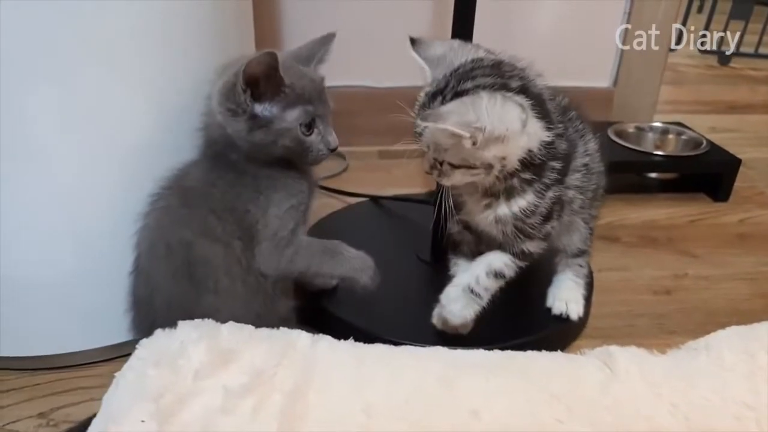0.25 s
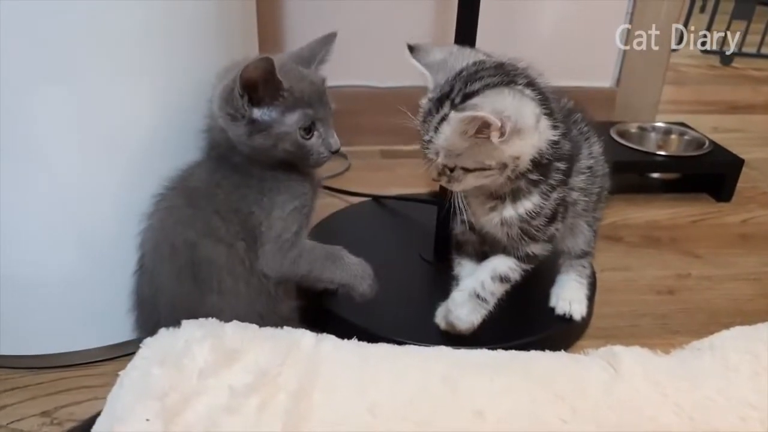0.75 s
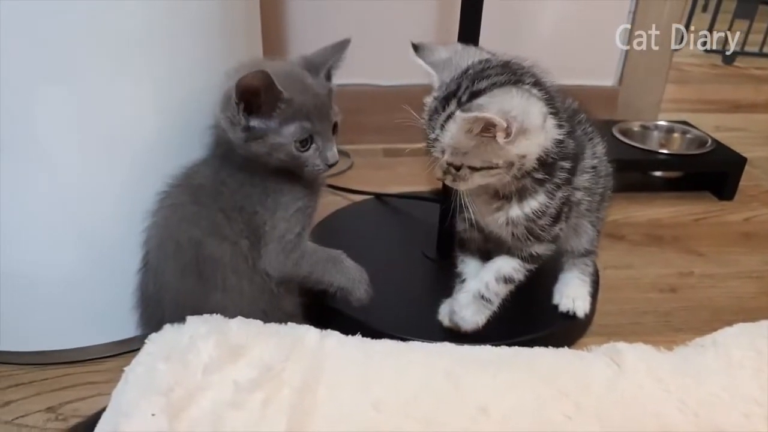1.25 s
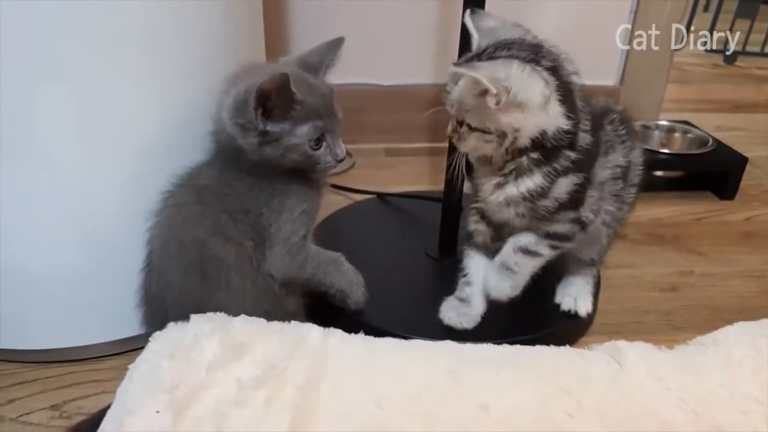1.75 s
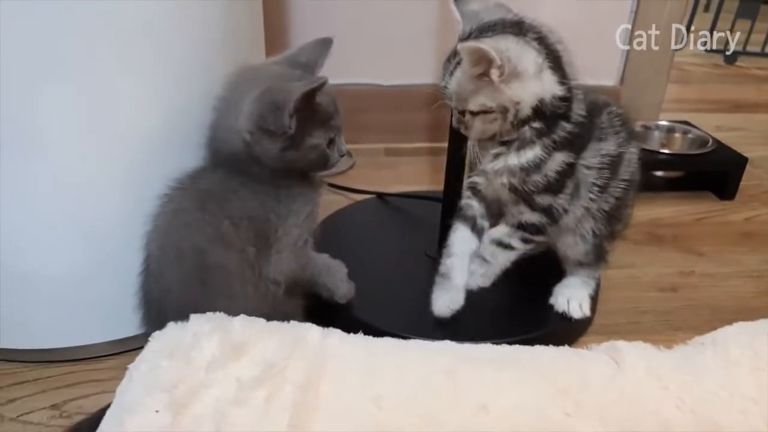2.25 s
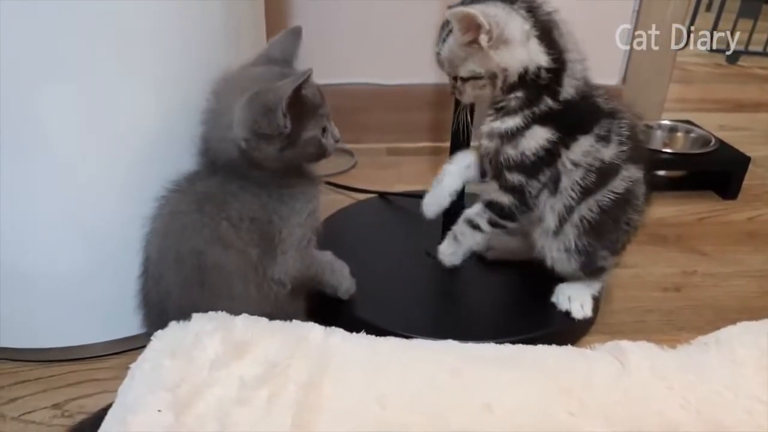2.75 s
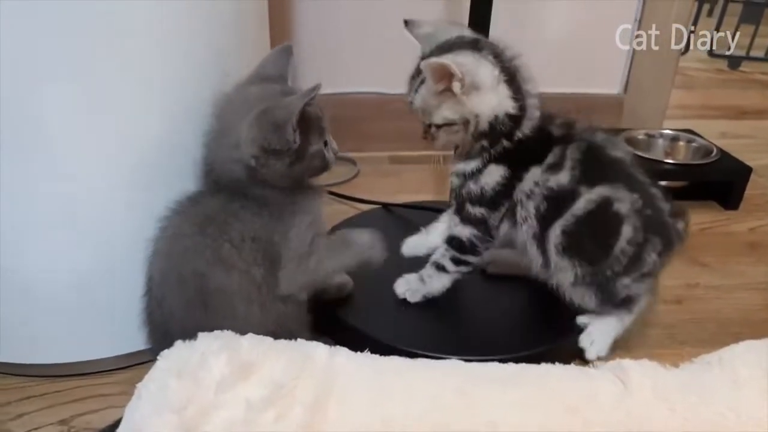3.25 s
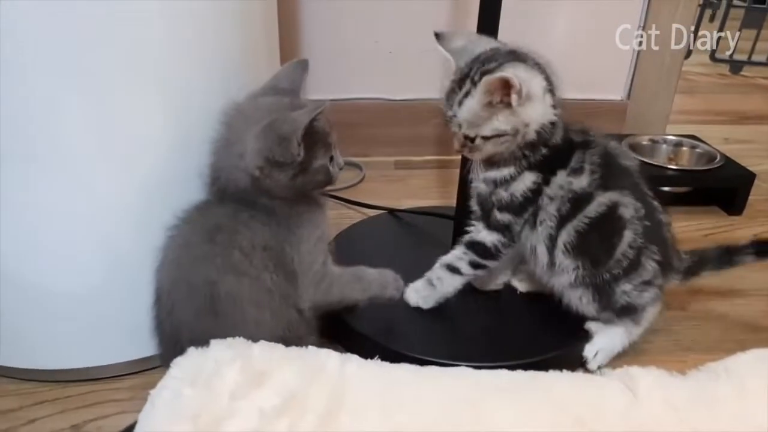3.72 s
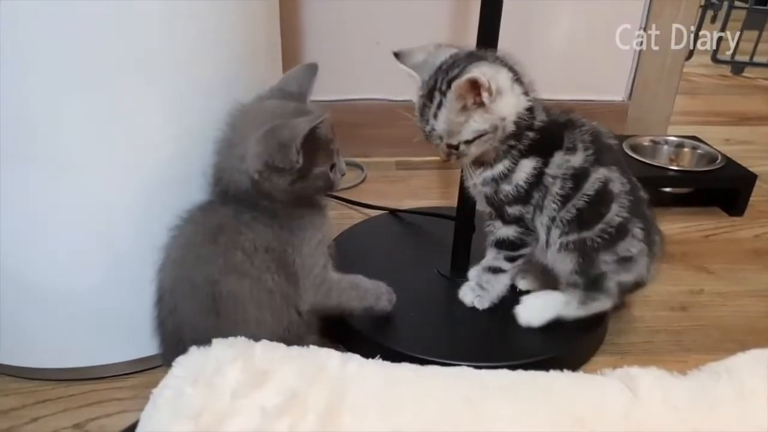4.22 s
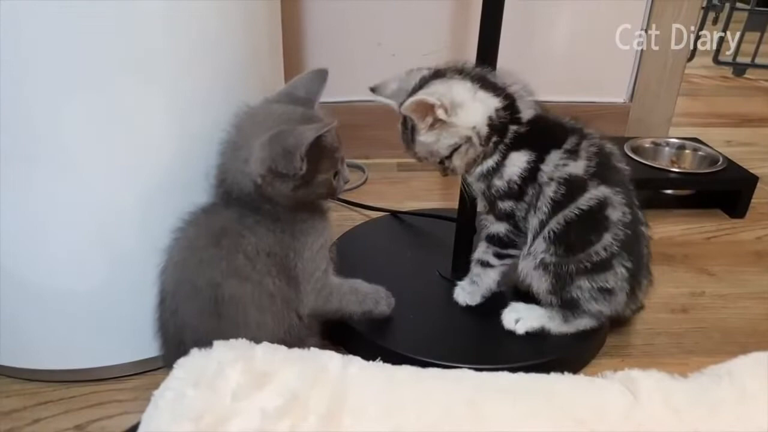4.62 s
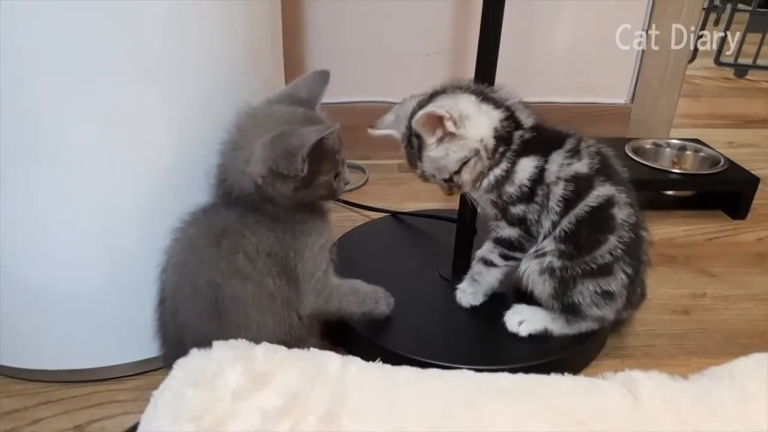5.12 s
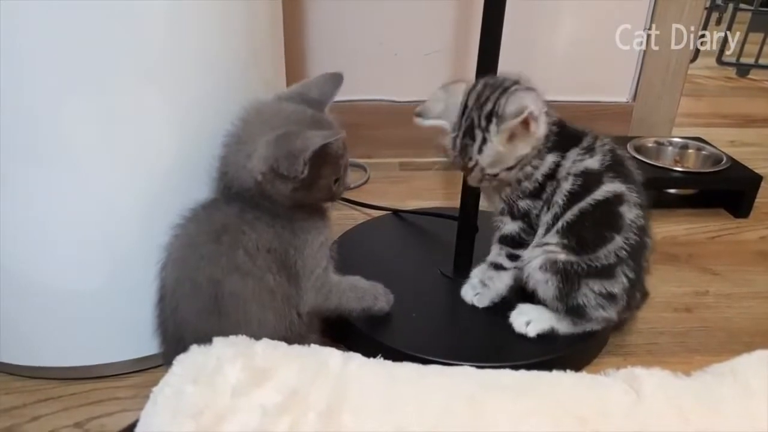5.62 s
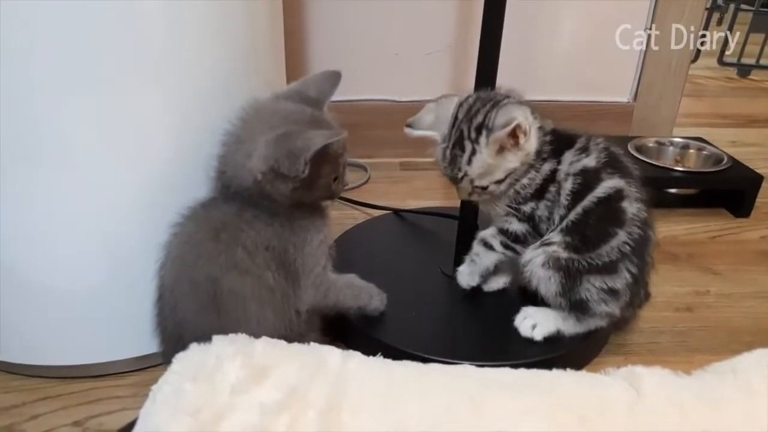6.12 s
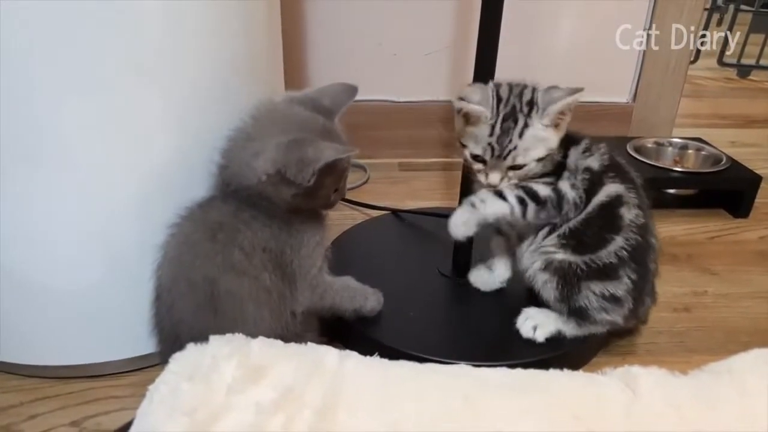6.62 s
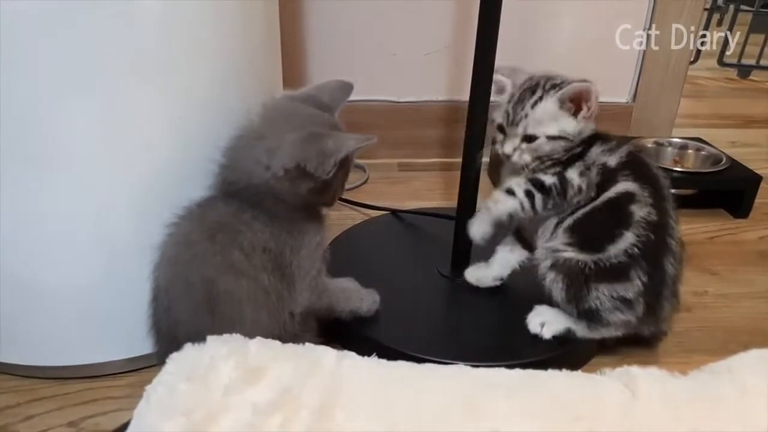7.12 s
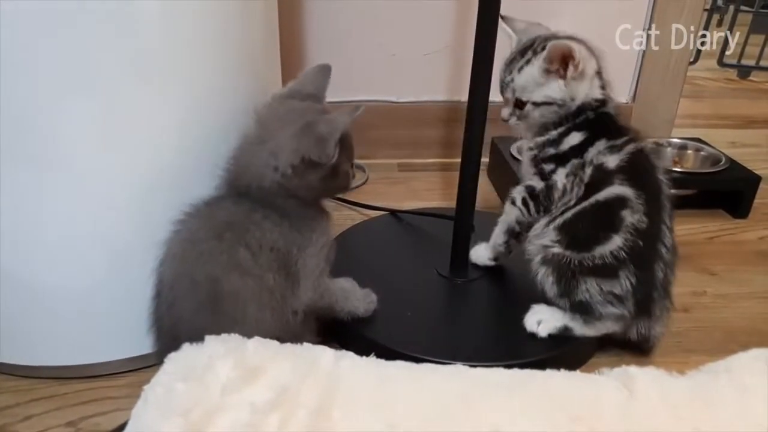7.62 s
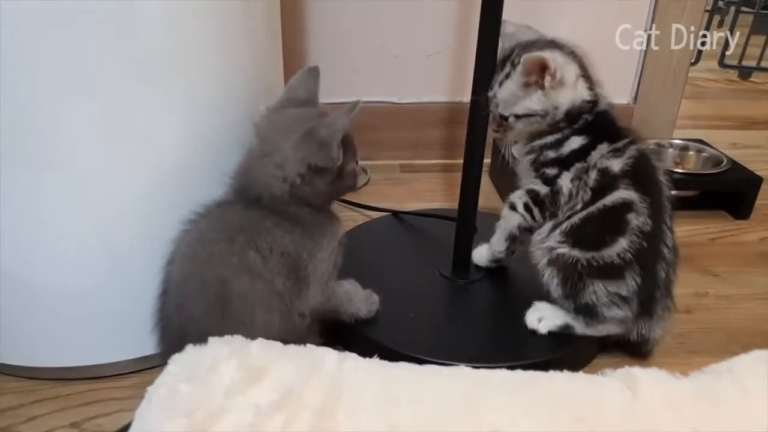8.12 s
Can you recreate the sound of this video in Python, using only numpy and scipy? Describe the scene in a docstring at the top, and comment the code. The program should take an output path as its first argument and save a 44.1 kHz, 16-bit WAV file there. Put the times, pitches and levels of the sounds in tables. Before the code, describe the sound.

A quiet room with a deep, distant engine drone that swells and fades in uneven pulses, rising slightly in pitch over the first 2.5 seconds and slowly sinking after 4. Muffled traffic roar, faint hiss and a soft murmur on the right lie beneath. Almost nothing happens nearby until a faint brush at 1.9 and a tiny high squeak at 2.3, about a tenth of a second long, dipping then rising. From 3.0 to 3.75 paws rub the plastic base in light, fuzzy scuffs. Faint touches and a soft landing follow from 4.1 to 5.0. At 5.5 scraping starts, peaking at 5.65-5.75 with a hard, bright rattle of claw clicks; another scratch comes at 6.1. A soft thump falls at 6.6, gentle scuffs around 7.0-7.2, a deeper dull thump at 7.6, and a last faint tick and brush at 8.1.

```python
"""Kittens scuffling on a plastic base

Paws of two kittens drag and claws click close by: noise and impulses excite the modes of the hard base,
with fur fizz, damped-sine landings, a short room tail and one squeak of gliding sines with subharmonics.
Behind them a distant engine drones as wavering multiples of its firing pattern, with hum and rumble,
under traffic roar and microphone hiss of filtered noise; the right microphone adds a resonant murmur."""
import sys
import numpy as np
from scipy import signal
from scipy.fft import rfft, irfft, next_fast_len
from scipy.io import wavfile
from scipy.ndimage import map_coordinates

SR = 44100
rng = np.random.default_rng(int(sys.argv[2]) if len(sys.argv) > 2 else 0)


def output_pcm(signal):
    """Save a mono or channel-first signal as 16-bit PCM at the path in sys.argv[1].

    Samples are clipped to [-1, 1] before scaling.
    """
    pcm = np.clip(np.atleast_2d(signal).T, -1, 1) * 32767
    wavfile.write(sys.argv[1], SR, np.round(pcm).astype(np.int16))


N = 369205  # length in samples


def amp(db):
    """Level law: decibels to amplitude gain."""
    return 10 ** (np.asarray(db) / 20)


def unit(x):
    """Normalisation: each channel is brought to rms 1."""
    return x / np.sqrt(np.mean(x ** 2, axis=-1, keepdims=True) + 1e-20)


def along(points, hz):
    """Interpolation on a logarithmic frequency axis through (f, value) points."""
    f, v = np.transpose(points)
    return np.interp(np.log(hz + 1), np.log(f + 1), v)


def curves(rows):
    """Linear interpolation in time: one value per sample for each column after the time."""
    s, *columns = np.transpose(rows)
    t = np.arange(N) / SR
    return np.array([np.interp(t, s, column) for column in columns])


def wobble(rate):
    """Slow random modulation: a smooth curve through random knots, rate of them a second."""
    knots = rng.standard_normal(int(N * rate / SR) + 4)
    return map_coordinates(knots, [np.arange(N) * rate / SR])


def filtered(x, response):
    """Linear filtering: the spectrum of x times a complex response of frequency."""
    m = next_fast_len(N + SR // 2)
    hz = np.fft.rfftfreq(m, 1 / SR)
    return irfft(rfft(x, m) * response(hz), m)[..., :N]


def coloured(spectrum, channels):
    """Spectral shaping of white noise: uncorrelated channels of rms 1 with one spectrum."""
    white = rng.standard_normal((channels, N))
    return unit(filtered(white, lambda hz: amp(along(spectrum, hz))))


def modes(table):
    """Modal superposition: causal resonances of alternating sign, unit mean power in the last column."""
    def response(f):
        total = 0
        for k, (centre, width, *db) in enumerate(table):
            resonance = 1j * f * width / (centre * centre - f * f + 1j * f * width)
            total = total + (-1) ** k * amp(db)[:, None] * resonance
        return total / np.sqrt(np.mean(np.abs(total[-1]) ** 2))
    return response


def room_tone():
    """Stationary and swelling noise: far traffic, microphone hiss, and resonant murmur at the right."""
    # relative noise density of the traffic: f/Hz, level/dB
    traffic_spectrum = [(150, -30), (220, 4), (400, -7.5), (520, -7.5), (700, -11.5), (850, -12.5),
                        (1200, -20), (2500, -50.5)]
    # strength of the traffic roar, before gusts: t/s, level/dB
    roar_level = [(0, -67), (.3, -75), (1.49, -69), (1.89, -76), (2.3, -62.5), (4.05, -62), (4.31, -58.5),
                  (5.5, -63), (5.8, -60), (6.36, -62), (7.81, -61), (8, -67), (8.37, -63.5)]
    # relative noise density of the hiss: f/Hz, level/dB
    hiss_spectrum = [(300, -29), (700, -2), (1500, -3.5), (3000, -5), (7500, -15.5), (12000, -13),
                     (16000, -14.5)]
    # resonances at the right microphone: f/Hz, width/Hz, relative level/dB
    murmur_humps = [(280.8, 56, 3), (321.3, 14, 1), (430, 174, -15.5), (590, 180, -20.5), (824, 36, -19.5),
                    (1608, 170, -27), (2330, 89, -29.5), (2894, 250, -25), (3150, 88, -18),
                    (3335, 270, -21), (3687, 90, -21.5), (4290, 200, -35.5), (11900, 740, -42)]
    # strength of the high humps of the murmur: t/s, level/dB
    high_murmur_level = [(0, -63.5), (1.2, -65.5), (2.2, -60.5), (2.9, -61.5), (4, -62.5), (6.5, -62),
                         (8.37, -64.5)]

    left, right, both = coloured(traffic_spectrum, channels=3)
    gusts_db = 1.5 * wobble(4)
    roar = amp(curves(roar_level)[0] + gusts_db) * (np.array([left, right]) + 0.68 * both)
    tone = roar + amp(-69) * coloured(hiss_spectrum, channels=2)

    def humps(f):
        power = sum(amp(2 * db) / (1 + (2 * (f - hz) / width) ** 4) for hz, width, db in murmur_humps)
        return np.sqrt(power)

    def murmur(band):
        wandering = rng.standard_normal(N) * amp(1.6 * wobble(8))
        return unit(filtered(wandering, lambda f: humps(f) * band(f)))

    # low and high humps waver apart
    tone[1] += amp(-50.5) * murmur(lambda f: f < 2000)
    tone[1] += amp(curves(high_murmur_level)[0]) * murmur(lambda f: f >= 2000)
    return tone


def engine():
    """Harmonic series of a periodic source: multiples of the firing pattern, with mains hum and rumble."""
    # far engine, rate of the firing pattern: t/s, f/Hz
    firing_rate = [(0, 24.3), (.7, 24.65), (1.3, 25.9), (2, 26.4), (2.7, 26.5), (3.4, 26.5), (4.1, 25.8),
                   (5, 24.7), (6, 24.05), (6.6, 23), (7, 22.2), (7.6, 21.3), (8.37, 20.6)]
    # swelling and fading of multiple 4: t/s, rms level/dB
    fourth_level = [(0, -36), (.27, -48), (.66, -39), (1.06, -58), (1.2, -36), (1.46, -34.5), (1.8, -50.5),
                    (1.99, -41), (2.26, -40), (2.52, -45.5), (2.66, -30), (2.8, -52), (3.06, -30),
                    (3.19, -48), (3.32, -36), (3.46, -49), (3.6, -39), (3.72, -37), (3.9, -43.5),
                    (4.04, -27), (4.15, -44), (4.3, -30), (4.58, -42.5), (4.78, -33), (5.05, -25.5),
                    (5.17, -43.5), (5.31, -35), (5.45, -43.5), (5.58, -34), (5.71, -48.5), (5.98, -38),
                    (6.11, -43), (6.4, -34), (6.64, -42.5), (6.86, -35), (7.04, -47), (7.17, -37),
                    (7.31, -52), (8.1, -50), (8.37, -47.5)]
    # swelling and fading of multiple 6: t/s, rms level/dB
    sixth_level = [(0, -53.5), (.66, -47), (.93, -56), (1.2, -47.5), (1.59, -47), (1.73, -57), (2.26, -40),
                   (2.39, -44.5), (2.52, -38), (2.66, -46), (2.79, -38), (3.06, -49.5), (3.19, -56),
                   (3.33, -41), (3.46, -55), (3.59, -41.5), (3.95, -43.5), (4.1, -35.5), (4.25, -49),
                   (4.38, -40.5), (4.85, -51.5), (5.05, -43), (5.31, -46), (5.55, -71), (5.85, -41),
                   (5.98, -59), (6.24, -41.5), (6.4, -59), (8.37, -73)]
    # weak multiples, before walls and drift: multiple, rms level/dB
    weak_orders = [(2, -50.5), (3, -49.5), (3.5, -49), (5, -45), (7, -53.5), (8, -59)]
    # transmission through the walls: f/Hz, gain/dB
    walls = [(42, -6), (50, -2), (64, -4), (74, 2.5), (90, -13.5), (105, 3.5), (120, 0), (132, -17),
             (160, 6), (180, -10), (215, -36)]
    # hum of an appliance: f/Hz, rms level/dB
    mains = (59.6, -55.5)
    # relative noise density of the rumble: f/Hz, level/dB
    rumble_spectrum = [(20, -31.5), (40, -8.5), (50, -7.5), (80, -5), (110, 0), (165, -8), (200, -20.5),
                       (300, -24.5), (500, -41.5), (900, -49.5), (2000, -88.5)]
    drift_db = 3.5  # slow wavering of the weak multiples

    speed = curves(firing_rate)[0]
    turns = np.cumsum(speed) / SR
    levels = [(4, curves(fourth_level)[0]), (6, curves(sixth_level)[0])]
    for order, db in weak_orders:
        levels.append((order, db + along(walls, order * speed) + drift_db * wobble(4)))
    lines = np.zeros(N)
    for order, db in levels:
        phase = 2 * np.pi * (order * turns + rng.random()) + 0.49 * wobble(6)
        lines += np.sqrt(2) * amp(db) * np.sin(phase)

    hum_hz, hum_db = mains
    hum = np.sqrt(2) * amp(hum_db) * np.sin(2 * np.pi * hum_hz * np.arange(N) / SR)
    shared, apart = coloured(rumble_spectrum, channels=2)
    centre = (lines + hum + amp(-42.5) * shared) * amp([[-.25], [.25]])
    return centre + amp(-53) * apart * [[1], [-1]]  # a little rumble in antiphase


def thuds():
    """Damped oscillation: a soft paw landing is a low sine with a quick onset and exponential decay."""
    # soft landings: t/s, level/dB of the decay at its start, f/Hz
    landings = [(4.08, -37, 150), (6.575, -32, 190), (7.638, -24, 72)]
    out, t = np.zeros(N + SR), np.arange(SR // 5) / SR
    for s, db, hz in landings:
        decay = amp(db - 60 * t / 0.1)  # 60 dB in 0.1 s
        onset = 1 - np.exp(-t / 0.0019)
        out[round(s * SR):][:len(t)] += decay * onset * np.sin(2 * np.pi * hz * t)
    return out[:N]


def squeak():
    """Stick-slip friction: a gliding tone and octave, with subharmonics from alternate weak pulses."""
    # glide of the squeak: t/s, f/Hz, level/dB of the fundamental before roughness and balance
    glide = [(2.283, 1120, -75), (2.288, 1080, -53), (2.298, 960, -52), (2.306, 925, -47), (2.33, 945, -47),
             (2.34, 965, -44), (2.348, 1000, -53), (2.374, 1080, -52), (2.381, 1135, -45),
             (2.394, 1145, -47), (2.42, 1150, -75)]
    clear_db, rough_per_db = -48, .05  # the weaker the squeak, the rougher, within limits
    # lines halfway between harmonics: strongest at the lowest pitch, then they stop
    halfway_db, halfway_fade_db_per_hz, halfway_end_s = -8, .2, 2.322  # level before the line weights
    octave_fade_s, octave_fade_db_per_s = 2.315, 260  # the octave thins out from here

    pitch_hz, level_db = curves(glide)
    t = np.arange(N) / SR
    rough = np.clip(.1 + rough_per_db * (clear_db - level_db), .1, .35)
    halfway = amp(halfway_db - halfway_fade_db_per_hz * (pitch_hz - pitch_hz.min()))
    halfway *= np.clip((halfway_end_s - t) / .01, 0, 1)
    octave = amp(-octave_fade_db_per_s * np.clip(t - octave_fade_s, 0, 1))

    phase = 2 * np.pi * np.cumsum(pitch_hz) / SR + 1.7 * rough * wobble(300)
    tone = np.sin(phase) + octave * np.sin(2 * phase)
    tone += halfway * (1.3 * np.sin(3 / 2 * phase) + 1.7 * np.sin(5 / 2 * phase))
    sounding = (t > glide[0][0]) & (t < glide[-1][0])
    envelope = sounding * amp(level_db + 9 * rough * wobble(160))
    return envelope * tone * amp([[-.5], [.5]])


def room(x):
    """Reverberant decay: convolution with a noise tail whose T60 depends on f, different on each side."""
    # reverberation time: f/Hz, T60/s
    decay_time = [(500, 0.35), (3000, 0.13), (12000, 0.02)]
    hz, t, cells = signal.stft(rng.standard_normal((2, SR // 3)), SR, nperseg=256)
    fading = amp(-60 * t / along(decay_time, hz)[:, None])
    tail = signal.istft(cells * fading, SR, nperseg=256)[1]
    return signal.fftconvolve(x, tail / np.linalg.norm(tail[0]), axes=1)[:, :N]


def strokes():
    """Friction envelopes: each drag swells to a peak, holds and dies away, for five excited parts."""
    # paw drags: peak t/s, rise/ms per 20 dB, fall/ms per 20 dB, then drive level/dB of
    # lower plastic modes, upper plastic modes, hollow modes, fur fizz, fur sheen
    drags = [ (1.896, 14, 65, -84, -64, -91, -69, -67), (3.026, 38, 62, -70, -60, -76, -74.5, -75),
             (3.075, 60, 69, -52.5, -50.5, -58, -64.5, -65.5),
             (3.189, 53, 110, -53.5, -46.5, -68, -61.5, -62), (3.304, 60, 78, -63, -61, -72, -64, -62),
             (3.359, 39, 50, -50.5, -43, -68, -52, -48.5), (3.372, 24, 30, -60, -41.5, -72, -52, -47.5),
             (3.385, 20, 32, -61, -63, -57, -54.5, -53), (3.42, 40, 198, -65, -60, -80, -60.5, -62.5),
             (3.49, 30, 68, -64, -66, -70, -70, -68), (3.641, 25, 45, -62, -49.5, -67, -62, -57),
             (3.662, 30, 73, -57.5, -54, -74, -58, -54.5), (3.72, 50, 250, -71.5, -64.5, -76, -74, -73),
             (4.11, 42, 130, -65.5, -63, -77, -71, -72.5),
             (4.336, 78, 110, -67.5, -62.5, -88, -70.5, -69.5),
             (4.454, 38, 60, -66.5, -72, -64, -75, -84.5), (4.53, 32, 90, -61, -58.5, -60, -78.5, -84),
             (4.922, 31, 89, -62, -58, -62.5, -71, -74.5), (5.014, 41, 69, -55.5, -54, -59, -71, -73),
             (5.528, 16, 52, -44, -47.5, -51, -58.5, -64.5), (5.62, 45, 49, -63, -51.5, -79, -63, -73),
             (5.659, 23.5, 59, -32.5, -35.5, -46.5, -49.5, -63.5),
             (5.717, 4.5, 34, -38, -37, -50.5, -64, -68), (5.77, 48, 115.5, -71, -59, -82, -68, -75),
             (5.882, 33, 40, -65, -68, -76, -85, -78), (5.954, 88, 113, -65, -57, -67, -76, -79.5),
             (6.098, 78, 60, -63, -65, -78, -90, -89), (6.135, 6.5, 41, -44, -38, -61, -85, -77),
             (6.152, 20, 120, -45.5, -47, -50.5, -70, -72.5), (6.2, 80, 177, -61, -55.5, -64, -59.5, -65.5),
             (6.456, 142, 100, -68, -62.5, -70, -78, -81), (6.575, 20, 120, -67, -63, -75, -78, -80),
             (6.817, 10, 58, -70, -60.5, -76, -68, -58), (6.86, 40, 250, -81, -65, -82, -72.5, -65),
             (7.003, 46, 40, -60, -49, -65.5, -66, -67), (7.024, 20, 76, -55.5, -47, -62, -59, -63.5),
             (7.07, 50, 45, -65, -70, -60, -77, -69), (7.13, 77, 80, -57, -49.5, -70, -57, -52.5),
             (7.185, 48, 25, -65, -80, -59, -72, -72.5), (8.112, 5, 50, -69, -49, -70, -77.5, -67.5),
             (8.13, 20, 138, -64, -75, -63, -58.5, -63)]
    hold_s = 0.0071  # a drag stays at its peak this long
    out, t = np.zeros((5, N + 2 * SR)), np.arange(-SR // 2, SR) / SR
    for s, rise_ms, fall_ms, *db in drags:
        rise = -1000 * t / rise_ms
        fall = 1000 * np.maximum(t - hold_s, 0) / fall_ms
        shape = amp(-20 * np.maximum(rise, fall))
        out[:, round(s * SR):][:, :len(t)] += amp(db)[:, None] * shape
    return out[:, SR // 2:][:, :N]


def grit(spiky_db):
    """Granular friction: dense tiny slips of uneven size, in clumps."""
    sizes = amp(spiky_db * rng.exponential(size=N) + 1.97 * wobble(170))
    return unit(sizes * rng.standard_normal(N) * (rng.random(N) < .12))


def plastic(lower, upper):
    """Modal resonance: two mode groups of the base ring, and a band-pass weakens all far outside them."""
    # modes of the plastic base: f/Hz, width/Hz, relative left level/dB, relative right level/dB
    lower_modes = [(1683, 230, -16, -15), (2110, 200, -19, -9), (2324, 150, -10, -12.5),
                   (2547, 138, -7, 0.5), (2838, 130, -16.5, -0.5)]
    # the higher group, same columns: f/Hz, width/Hz, left level/dB, right level/dB
    upper_modes = [(2995, 260, -11.5, -7.5), (3186, 145, -16, 3), (3280, 187, -10.5, 3),
                   (3603, 113, -21.5, 2.5), (3856, 140, -10.5, -1), (4230, 370, -28, -14)]
    ring = filtered(lower, modes(lower_modes)) + filtered(upper, modes(upper_modes))
    band = signal.butter(3, [1550, 5000], "bandpass", fs=SR, output="sos")
    return signal.sosfilt(band, ring)


def fur(fizz, sheen):
    """Broadband friction noise: fizz, uncorrelated on each side; its top, the sheen, has its own strength."""
    # relative noise density of the fur: f/Hz, level/dB
    fur_spectrum = [(1500, -92), (3800, -12), (5000, 0), (6000, -0.5), (6550, 7), (7200, -3), (9000, -1),
                    (11000, -4), (13000, -2), (15700, -8)]
    hairs = amp(0.73 * wobble(90)) * coloured(fur_spectrum, channels=2)
    # the camera body shades the left treble
    hairs = filtered(hairs, lambda hz: amp(np.array([[-.3], [.3]]) * hz / 1000 + 1.0))
    top = filtered(hairs, lambda hz: 1 / (1 + (8500 / (hz + 1)) ** 4))
    return fizz * (hairs - top) + sheen * top


def paws():
    """Forced vibration: friction noise and claw impulses excite the resonances of the plastic base."""
    # claw clicks: t/s, impulse level/dB
    claws = [(3.19, -29), (4.115, -35), (5.0155, -28), (5.5313, -23), (5.6804, -18), (5.7174, -11),
             (5.7254, -10), (5.7374, -13), (5.7484, -19), (5.9179, -37), (5.9703, -32), (6.1005, -33),
             (6.117, -32), (6.1324, -26), (6.1389, -17), (6.1644, -24), (7.0219, -24), (7.137, -26),
             (8.1115, -35)]
    # hollow modes of the base: f/Hz, width/Hz, relative left level/dB, relative right level/dB
    hollow_modes = [(1148, 196, -1, 1.5), (1180, 178, 0.5, 2.5)]

    lower, upper, hollow, fizz, sheen = strokes()
    blows = np.zeros(N)
    for s, db in claws:
        skip_db = -9 + rng.normal(0, 2)  # a claw tip skips once, 60 samples later
        blows[round(s * SR) + np.array([0, 60])] = amp(db + np.array([0, skip_db]))

    # scattered paths differ per side
    side_grit = np.array([grit(spiky_db=-2.0), grit(spiky_db=3.0)])
    rub = grit(spiky_db=1.56) + amp(-3.5) * side_grit
    # the pad lifts as a claw strikes, and recovers with a 12 ms time constant
    lifted = signal.lfilter([1], [1, -np.exp(-1 / (.012 * SR))], blows > 0)
    rub = rub * (1 - .45 * np.clip(lifted, 0, 1))

    body = amp(1.2) * plastic(lower * rub, upper * rub) + plastic(0.8 * blows, blows)
    low = amp(-0.6) * filtered(hollow * rng.standard_normal(N), modes(hollow_modes))

    def lag(hz):  # the left microphone is a little further: 0.07 ms
        return np.exp(-2j * np.pi * hz * np.array([[.00007], [0]]))

    return filtered(body + low, lag) + fur(fizz, sheen)


def scene():
    """Superposition: near sounds, the paws and squeak with a room tail, over engine and room tone."""
    near, cry = paws(), squeak()
    tail = amp(-7.5) * room(near)
    echo = amp(-7) * room(cry)
    return near + tail + cry + echo + thuds() + engine() + room_tone()


def record(dry):
    """Band limitation: the camera keeps nothing above a sharp cutoff."""
    top_hz = 15714
    return filtered(dry, lambda hz: hz < top_hz)


dry = scene()
out = record(dry)
output_pcm(out)
```